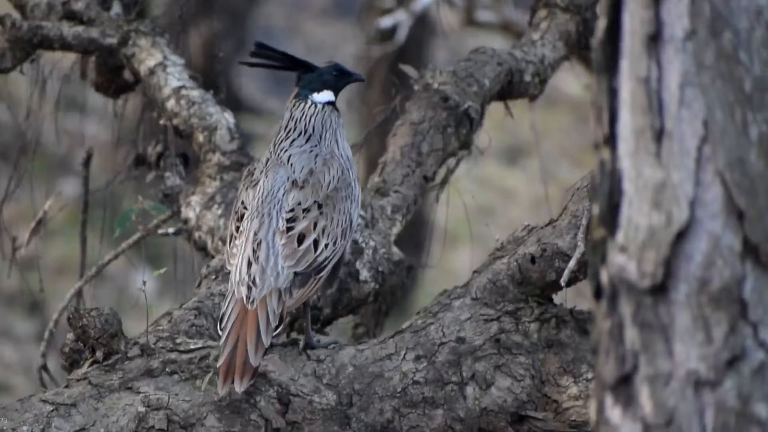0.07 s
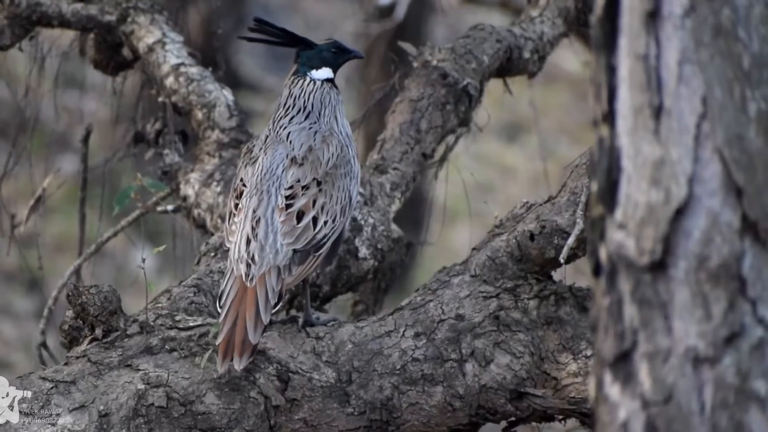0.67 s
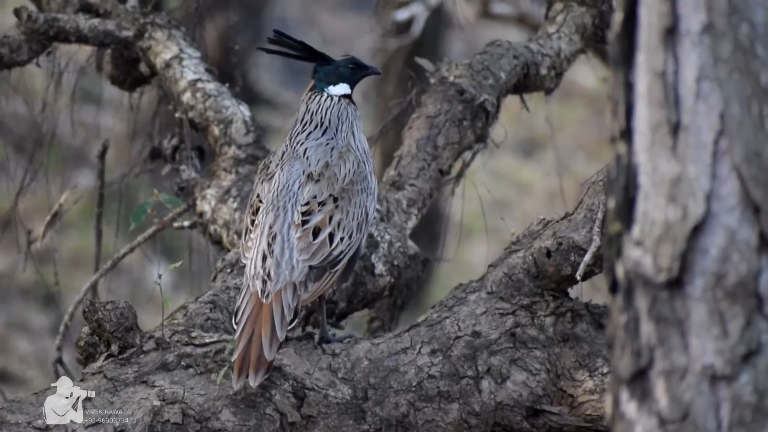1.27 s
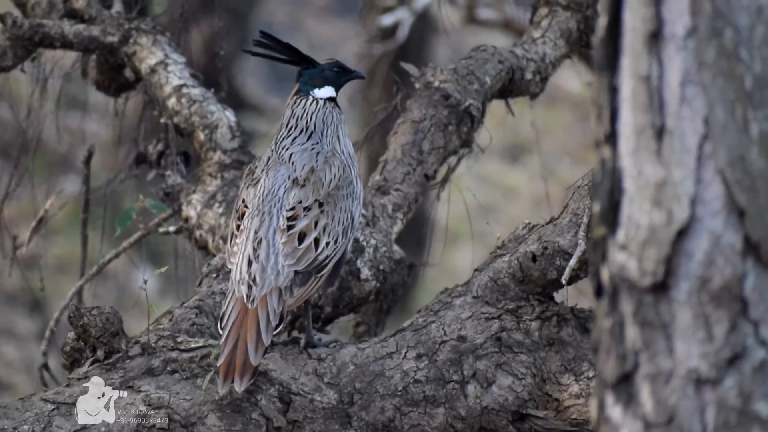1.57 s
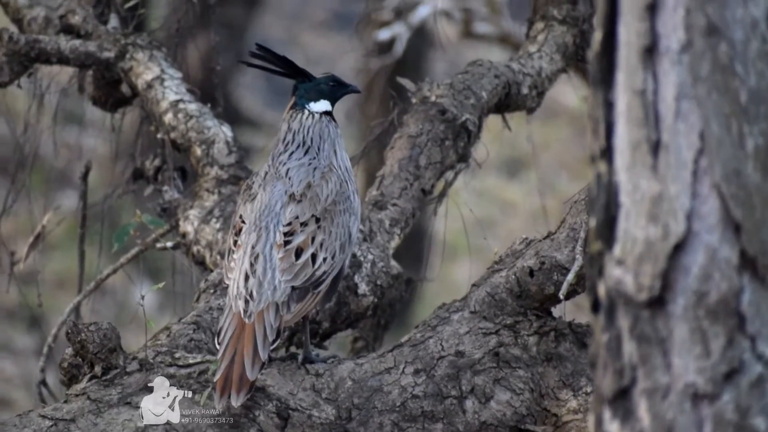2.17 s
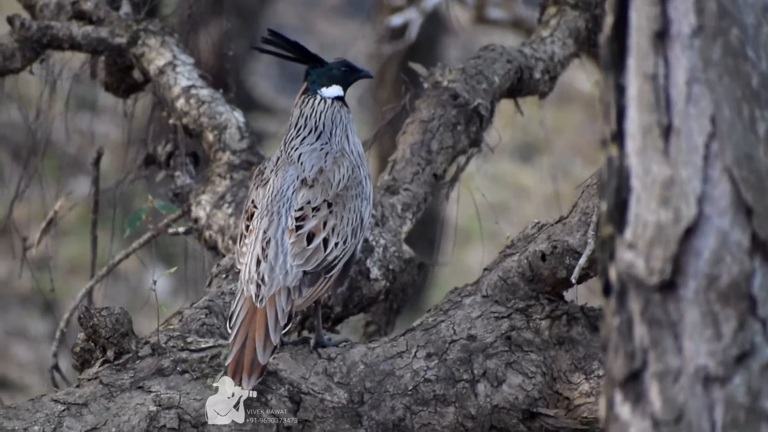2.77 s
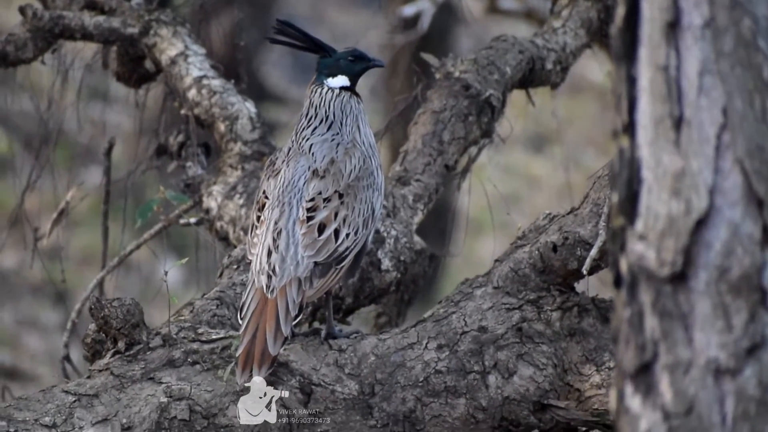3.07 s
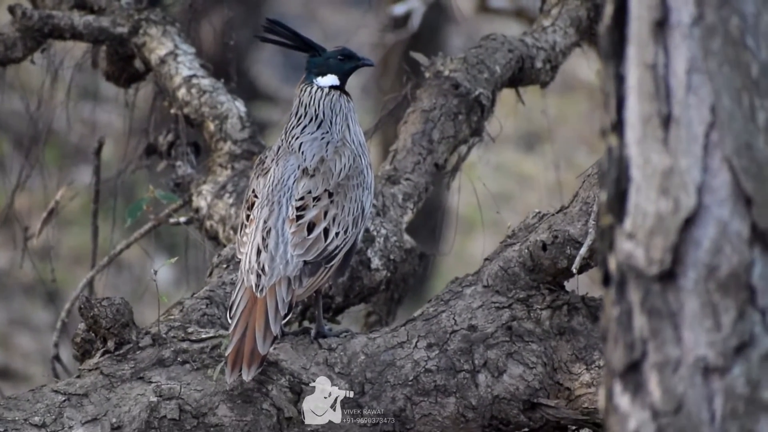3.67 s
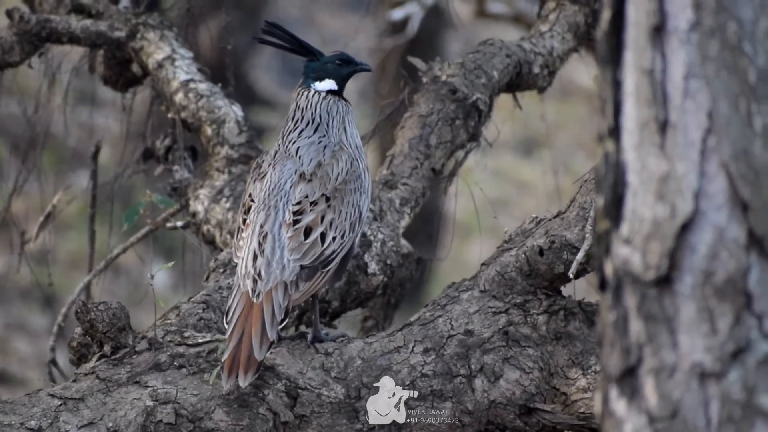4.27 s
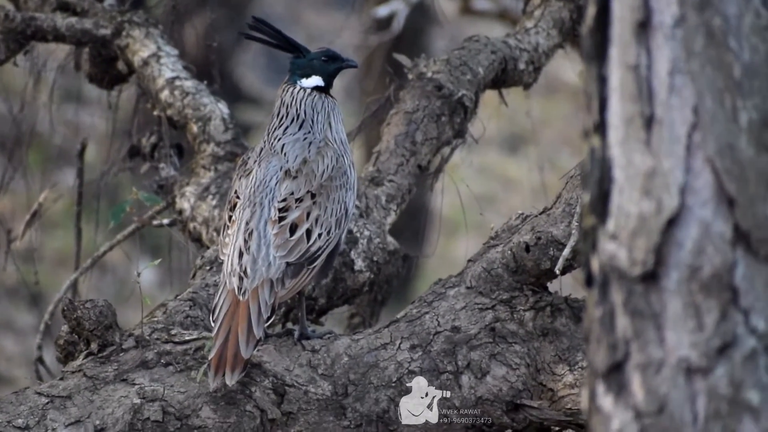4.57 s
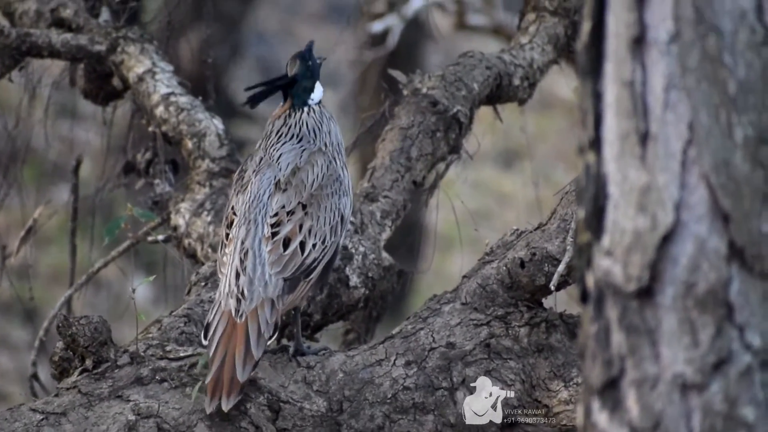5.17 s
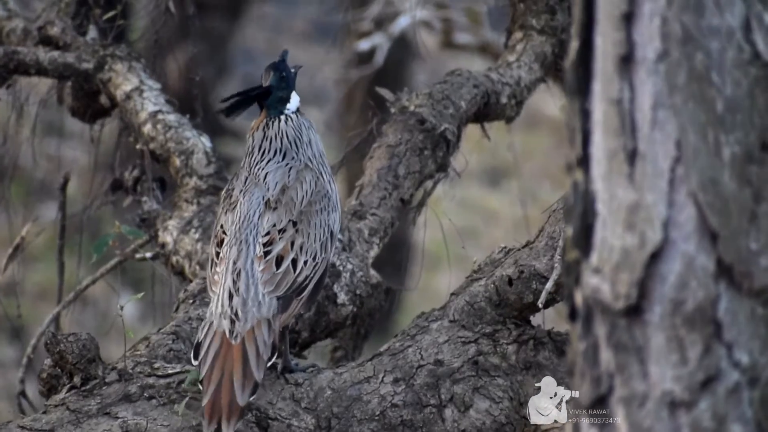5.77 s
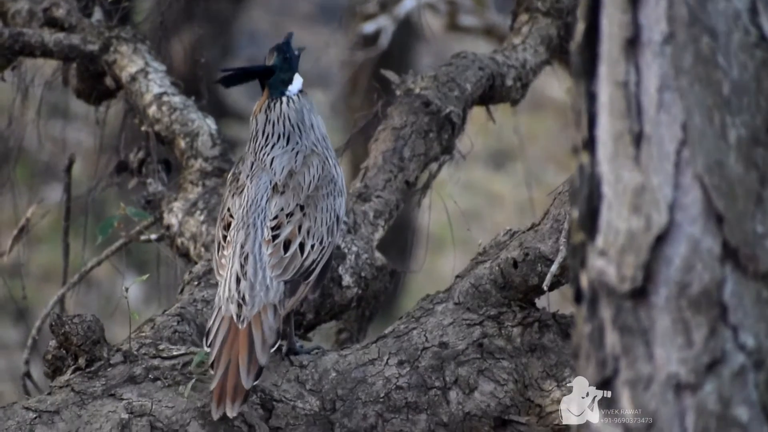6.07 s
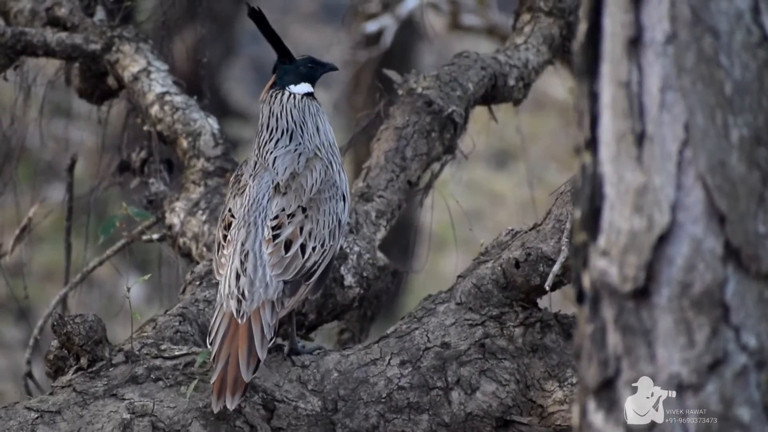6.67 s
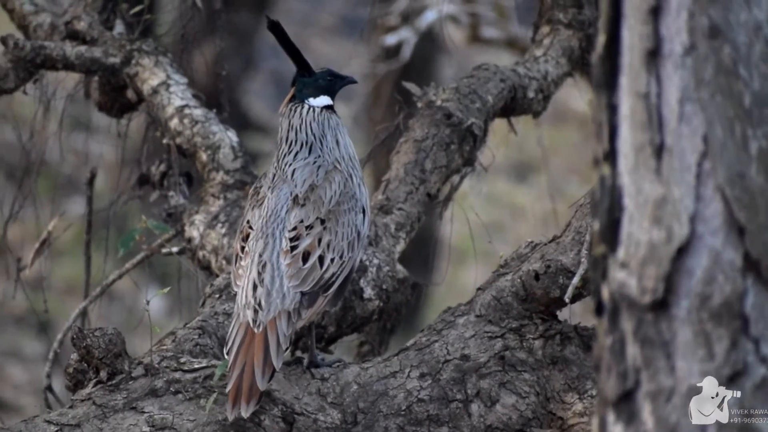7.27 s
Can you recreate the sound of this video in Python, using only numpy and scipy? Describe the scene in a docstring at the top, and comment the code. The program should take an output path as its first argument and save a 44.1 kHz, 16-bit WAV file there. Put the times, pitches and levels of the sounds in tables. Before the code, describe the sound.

Small birds whistle, chirp and twitter at a distance over a low, steady hush of woodland air. After several calm seconds a nearby pheasant breaks in with one loud, raspy call of five quick syllables, far louder than everything else. Its echo fades among the trees, leaving the thin chirps and whistles of the distant birds.

```python
"""A pheasant on a forest branch crows five harsh syllables: the membranes of its syrinx slap shut
unevenly, buzzing through throat and beak, and the trees answer with a long ring.
Further off one songbird see-saws two whistles, another chirps, others twitter and slur, all on
gliding sine tones. Underneath lie a soft rush of forest air, a few dull bumps and one tiny tick."""
import sys
import numpy as np
from scipy import signal
from scipy.fft import rfft, irfft, next_fast_len
from scipy.io import wavfile
from scipy.ndimage import uniform_filter1d, map_coordinates

SR = 44100
rng = np.random.default_rng(int(sys.argv[2]) if len(sys.argv) > 2 else 0)


def waveform_to_disk(signal):
    """Save audio, clipped to [-1, 1], as 16-bit WAV at the path in sys.argv[1]."""
    frames = np.transpose(np.atleast_2d(signal))
    scaled = np.clip(frames, -1, 1) * 32767
    samples = np.round(scaled).astype(np.int16)
    wavfile.write(sys.argv[1], SR, samples)


N = 331191


def amp(db):
    """Decibels to gain."""
    return 10 ** (np.asarray(db) / 20)


def unit(x):
    """Scale to rms 1."""
    return x / np.sqrt(np.mean(x ** 2) + 1e-20)


def along(points, hz):
    """Read a curve of (f/Hz, value) points on a log frequency axis."""
    f, v = np.transpose(points)
    return np.interp(np.log(hz + 1), np.log(f + 1), v)


def wobble(rate, size):
    """A smooth random modulator, rate knots a second."""
    knots = rng.standard_normal(int(size * rate / SR) + 4)
    return map_coordinates(knots, [np.arange(size) * rate / SR])


def filtered(x, response):
    """Zero-phase EQ; response gives the gain at each frequency."""
    size = x.shape[-1]
    padded = next_fast_len(size + 8192)
    return irfft(rfft(x, padded) * response(np.fft.rfftfreq(padded, 1 / SR)), padded)[..., :size]


def eq(x, points):
    """Shape x with a curve of (f/Hz, gain/dB) points."""
    return filtered(x, lambda hz: amp(along(points, hz)))


def resonate(x, points, size=2048):
    """Ring x through a causal (minimum-phase) body with this spectrum."""
    cepstrum = irfft(np.log(amp(along(points, np.fft.rfftfreq(size, 1 / SR)))))
    cepstrum[1:size // 2] *= 2
    cepstrum[size // 2 + 1:] = 0
    impulse = irfft(np.exp(rfft(cepstrum)))
    return signal.fftconvolve(x, impulse)[:len(x)]


def add(track, s, x):
    """Mix x into the track at time s."""
    part = track[..., max(round(s * SR), 0):][..., :x.shape[-1]]
    part += x[..., :part.shape[-1]]


def sine(hz):
    """A tone of rms 1 that follows a pitch curve."""
    return np.sqrt(2) * np.sin(2 * np.pi * np.cumsum(hz) / SR)


def steadied(x, size=700):
    """Hold the slow level of x at rms 1, keeping its fast grain."""
    return x / np.sqrt(np.abs(uniform_filter1d(x * x, size)) + 1e-12)


def stereo(mid, side):
    """Left and right from mid and side."""
    return np.array([mid + side, mid - side])


# tone of the air bed: f/Hz, relative level/dB
RUSH_EQ = [(15, -54), (25, -33), (133, -10), (260, -3), (340, -5.5), (399, 0), (537, -9), (741, -6),
           (1020, -9), (1490, -7.5), (2360, -12.5), (4040, -13.5), (6050, -22.5), (10400, -31.5),
           (15500, -38)]
# width of the air bed: f/Hz, side minus mid/dB
RUSH_WIDTH = [(60, -32), (150, -18.5), (380, -12.5), (950, -5.5), (2380, -5.5), (5980, -3), (15000, 1.5)]
# tone of the far rumble: f/Hz, relative level/dB
RUMBLE_EQ = [(80, -32), (120, -14.5), (200, -7.5), (270, 3.5), (330, -4.5), (400, -3.5), (520, -20),
             (900, -66)]
def air(rush_db=-57, rumble_db=-66, drone_hz=65, drone_db=-85):
    """A soft steady rush through the trees, with a low far rumble and a faint drone."""
    mid, side = unit(eq(rng.standard_normal((2, N)), RUSH_EQ))
    rush = amp(rush_db) * stereo(mid, eq(side, RUSH_WIDTH))
    mid, side = unit(eq(rng.standard_normal((2, N)), RUMBLE_EQ))
    rumble = amp(rumble_db + 1.8 * wobble(7.5, N)) * stereo(mid, amp(-28) * side)
    drone = amp(drone_db + 2 * wobble(6, N)) * sine(drone_hz * (1 + 0.029 * wobble(6.7, N)))
    return rush + rumble + drone


# soft low bumps: t/s, length/s, f/Hz, level/dB
DULL_BUMPS = [(5.74, 0.058, 253, -50.5), (5.777, 0.085, 263, -48.5), (7.023, 0.064, 247, -51)]
def bumps_and_tick(waver=0.089, tick_s=4.229, tick_db=-53, tick_t60=0.0081):
    """Short swells of a wavering low tone, and one dry snap of bright noise."""
    out = np.zeros(N)
    for s, length, hz, db in DULL_BUMPS:
        size = int(length * SR)
        add(out, s, amp(db) * np.hanning(size) * sine(hz * (1 + waver * wobble(114, size))))
    t = np.arange(SR // 20) / SR
    burst = rng.standard_normal(len(t)) * amp(-60 * t / tick_t60)
    snap = resonate(burst, [(2000, -12), (7000, 8), (11500, 8), (15000, -14)])
    add(out, tick_s, amp(tick_db) * snap)
    return out


# ring time of the wood: f/Hz, T60/s
TAIL_DECAY = [(200, 0.59), (800, 1.5), (1500, 1.4), (2500, 1.2), (4200, 0.86), (7000, 0.58), (13000, 0.25)]
# colour of that ring: f/Hz, relative level/dB
TAIL_EQ = [(300, -25), (800, -2), (1150, -18), (1450, -4), (1670, -5), (2000, -11.5), (2500, -8),
           (4200, -5.5), (8000, 3), (14000, -4.5)]
# width of the reverb: f/Hz, side minus mid/dB
REVERB_WIDTH = [(500, -29), (1500, -20), (2500, -11), (5000, -11.5), (12000, -8.5)]
def forest(x, wet_db, near_db, build_s=0.01, near_t60=0.39):
    """Near trunks scatter the sound at once; the wood beyond rings on, longest in the mids."""
    hz, t, noise = signal.stft(rng.standard_normal((2, int(1.3 * SR))), SR, nperseg=256)
    decay = amp(along(TAIL_EQ, hz)[:, None] - 60 * t / along(TAIL_DECAY, hz)[:, None])
    build = 1 - np.exp(-t / build_s)
    tail = signal.istft(noise * decay * build, SR, nperseg=256)[1]
    near = rng.standard_normal(tail.shape) * amp(-60 * np.arange(tail.shape[1]) / SR / near_t60)
    mid, side = (amp(wet_db) * tail / np.linalg.norm(tail[0])
                 + amp(near_db) * near / np.linalg.norm(near[0]))
    mid[0] += 1  # the direct path
    impulse = stereo(mid, eq(side, REVERB_WIDTH))
    return signal.fftconvolve(x[None], impulse, axes=1)[:, :N]


def chorus(count=38, level_db=-67, low_hz=2200, high_hz=4700, glide=0.0965, length=0.072, waver=0.0287):
    """Faint scattered slurs from the farthest birds."""
    out = np.zeros(N)
    u = np.linspace(-1, 1, int(length * SR))
    for when, pitch, slope in rng.uniform(0, 1, (count, 3)):
        centre_hz = low_hz * (high_hz / low_hz) ** pitch
        bend = np.exp(glide * (2 * slope - 1) * u + waver * wobble(147, len(u)))
        add(out, when * N / SR, amp(level_db) * (1 - u * u) * sine(centre_hz * bend))
    return out


def slur(length, start_hz, end_hz, ease, waver):
    """A short wavering glide; with ease above 1 it moves fast at first and then levels off."""
    u = np.linspace(0, 1, int(length * SR))
    hz = end_hz + (start_hz - end_hz) * (1 - u) ** ease
    swell = np.sqrt(np.abs(np.sin(np.pi * u)))
    return swell * sine(hz * (1 + waver * wobble(160.3, len(u))))


# the distant song: t/s, length/s, start f/Hz, end f/Hz, level/dB
FAR_SONG = [(0.097, .052, 2360, 3020, -59.5), (0.867, .079, 2600, 3030, -62),
            (0.949, 0.065, 3750, 3560, -54), (1.713, 0.14, 2640, 3000, -60),
            (2.646, 0.033, 3340, 3570, -57), (2.775, .045, 5300, 3700, -55),
            (2.776, 0.087, 1975, 2093, -59), (3.046, 0.16, 2920, 2327, -60), (3.42, 0.037, 5750, 6050, -66),
            (3.515, .08, 3310, 2470, -60.5), (3.665, .098, 2234, 2450, -59.5),
            (4.444, .046, 3700, 3710, -61.5), (6.876, 0.094, 2776, 3005, -59),
            (6.969, 0.13, 3660, 2994, -60.5), (7.387, .14, 3050, 2520, -55.5)]
def far_singer():
    """Mellow slurs from a bird deep in the trees."""
    out = np.zeros(N)
    for s, length, start_hz, end_hz, db in FAR_SONG:
        add(out, s, amp(db) * slur(length, start_hz, end_hz, ease=1.5, waver=0.0277))
    return out


# thin high slurs: t/s, start f/Hz, end f/Hz
THIN_SLURS = [(1.969, 5600, 7500), (2.055, 7200, 5640), (2.29, 5530, 6660), (2.46, 7200, 5560),
              (2.545, 5300, 7400), (2.615, 7100, 5840), (3.259, 8100, 6250), (3.59, 8200, 6400)]
# quick upward flicks: t/s, level/dB
UP_FLICKS = [(1.869, -60), (2.943, -56), (2.969, -51), (2.994, -63), (3.024, -55.5), (6.317, -53),
             (6.348, -49), (6.378, -53)]
def twitter(slur_s=.055, slur_db=-68.5):
    """A tiny bird runs thin slurs up and down, with a few sharper upward flicks."""
    out = np.zeros(N)
    for s, start_hz, end_hz in THIN_SLURS:
        add(out, s, amp(slur_db) * slur(slur_s, start_hz, end_hz, ease=1.4, waver=0.013))
    for s, db in UP_FLICKS:
        add(out, s, amp(db) * slur(length=0.022, start_hz=5480, end_hz=7280, ease=0.68, waver=0.011))
    return out


# trilled chirps: t/s, level/dB
CHIRP_CUES = [(.915, -56.5), (1.889, -38.5), (2.873, -38), (3.751, -42), (4.272, -55.5), (6.509, -54.5)]
def chirper(low_hz=3200, top_hz=5230, arch_s=.028, climb_s=.007, trill_start=.039, length=.092,
            trill_hz=100, trill_depth=0.071, low_db=-19, arch_db=-2, overtone_db=-37):
    """A quick arch, then a falling note with a fast trill on it; louder the higher it is."""
    out = np.zeros((2, N))
    t = np.arange(int(length * SR)) / SR
    arch = np.sin(np.pi * np.minimum(t / arch_s, 1))
    fall = np.interp(t, [trill_start - climb_s, trill_start, length], [0, 1, 0]) ** .75
    height = arch + fall
    trill_gate = np.interp(t - trill_start, [-.004, 0.0006, 0.018, 0.0305], [0, 1, 1, 0])
    trill = trill_depth * np.cos(2 * np.pi * trill_hz * (t - trill_start)) * trill_gate
    swell = amp(low_db * np.abs(1 - height) ** 1.56 + arch_db * (t < arch_s))
    nearest_db = max(db for s, db in CHIRP_CUES)
    for s, db in CHIRP_CUES:
        hz = (low_hz + (top_hz - low_hz) * height) * (1 + trill + 0.013 * wobble(196, len(t)))
        note = amp(db) * swell * (sine(hz) + amp(overtone_db) * sine(2 * hz))
        send_db = 0.27 * (nearest_db - db)  # fainter chirps are further off and wetter
        add(out, s, forest(note, wet_db=-12 + send_db, near_db=-8 + send_db))
    return out


def whistle(length, start_hz, end_hz, glide_s, steepness, peak_s, sharpness, release_s=.012, waver=.003):
    """A pure note that eases from one pitch to another, swelling early and dying away."""
    t = np.arange(int(length * SR)) / SR
    hz = end_hz + (start_hz - end_hz) * np.exp(-(t / glide_s) ** steepness)
    swell = (t / peak_s * np.exp(1 - t / peak_s)) ** sharpness
    release = np.clip((length - t) / release_s, 0, 1)
    return swell * release * sine(hz * (1 + waver * wobble(98, len(t))))


# see-saw whistle pairs: rising note t/s, falling note t/s, rising note level/dB
WHISTLE_PAIRS = [(0.164, 0.391, -61), (0.765, 1.007, -53), (1.379, 1.626, -52.5), (2.009, 2.261, -51),
                 (2.652, 2.894, -53), (7.154, 7.393, -57.5)]
def whistler(fall_db=-48):
    """A songbird alternates a rising and a falling pure whistle."""
    out = np.zeros(N)
    for rise_s, fall_s, rise_db in WHISTLE_PAIRS:
        rise = whistle(length=0.15, start_hz=4160, end_hz=4640, glide_s=.1, steepness=4.68,
                       peak_s=0.039, sharpness=1.4)
        fall = whistle(length=0.187, start_hz=4260, end_hz=3275, glide_s=.064, steepness=1.75,
                       peak_s=.066, sharpness=2.26)
        add(out, rise_s, amp(rise_db) * rise)
        add(out, fall_s, amp(fall_db) * fall)
    return out


def branches(x, count=7, reach_s=.009, echo_db=-16):
    """Weak reflections off the branches around the perch, new with each turn of the head."""
    delays = (rng.uniform(.1, 1, count) * reach_s * SR).astype(int)
    signs = rng.choice([-1, 1], count)
    copies = sum(sign * np.pad(x, (delay, 0))[:len(x)] for delay, sign in zip(delays, signs))
    return (x + amp(echo_db) * copies) / np.sqrt(1 + count * amp(2 * echo_db))


def syrinx(hz, jitter=.1, breath=.34, waver=0.04015, shimmer_db=3, rattle_db=1.5):
    """Membranes slap shut unevenly, once a cycle, with a puff of turbulence. Returns buzz and swing."""
    size = len(hz)
    cycles = np.cumsum(hz * (1 + waver * wobble(400, size))) / SR
    closures = np.arange(1, int(cycles[-1]))
    chance = rng.standard_normal((len(closures), 2))
    slap_at = np.interp(closures + jitter * chance[:, 0], cycles, np.arange(size))
    taps = slap_at.astype(int)[:, None] + np.arange(-7, 9)
    offset = taps - slap_at[:, None]
    slaps = amp(shimmer_db * chance[:, 1:]) * np.sinc(offset) * np.sinc(offset / 8)  # band-limited
    pulses = np.bincount(np.clip(taps, 0, size - 1).ravel(), slaps.ravel(), size)
    puffs = rng.standard_normal(size) * (1 + np.cos(2 * np.pi * cycles))
    rattle = amp(rattle_db * wobble(238.8, size))
    buzz = np.sqrt(1 - breath) * unit(pulses - pulses.mean()) + np.sqrt(breath) * unit(puffs)
    slip_rad = 0.57 * wobble(220.6, size)
    swing = np.sin(2 * np.pi * 2 * cycles + slip_rad)  # the membranes' smooth second harmonic
    flutter = amp(1.2 * wobble(167.6, size))
    return buzz * rattle, unit(swing * rattle * flutter)


# throat formants at the home pitch: f/Hz, relative level/dB
THROAT_FORMANTS = [(100, -64), (300, -55.5), (470, -31), (660, -16.5), (820, -16), (1000, -12),
                   (1280, -4.5), (1600, 4.5), (1950, -3), (2300, -6), (2650, -13), (3100, -24.5),
                   (3800, -70.5)]
def throat(buzz, hz, home_hz=790):
    """Resonances that slide with the pitch: they ring on a clock that runs faster as it rises."""
    clock = np.cumsum(hz / home_hz)
    ticks = np.arange(int(clock[-1]))
    ringing = resonate(np.interp(ticks, clock, buzz), THROAT_FORMANTS)
    return unit(np.interp(clock, ticks, ringing))


# the bright rasp around the beak's two resonances: f/Hz, relative level/dB
RASP_EQ = [(500, -85), (1900, -46.5), (2500, -3), (3100, -7), (3680, -3.5), (4550, -10.5), (5300, -20),
           (6250, -16.5), (6650, -19), (7400, -17), (8000, -23), (10000, -25), (13500, -42), (15500, -52.5)]
def beak(buzz, lower_db, upper_hz, lower_hz=3420, upper_db=2, treble_hz=5500):
    """The beak opens and closes over a syllable; when narrow it mutes the rasp, the top most of all."""
    gape = np.abs(np.sin(np.linspace(0, np.pi, len(buzz)))) + 1e-6
    formants = sorted(RASP_EQ + [(lower_hz, lower_db), (upper_hz, upper_db)])
    rasp = steadied(resonate(buzz, formants))
    treble = filtered(rasp, lambda hz: 1 - 1 / (1 + (hz / treble_hz) ** 10))
    return gape ** 0.4 * (rasp - treble * (1 - gape ** 0.77))


# the crow: t/s, length/s, attack/s, level/dB, level ramp/dB, f/Hz, pitch bend/Hz, effort/0-1
CROW_SYLLABLES = [(4.848, 0.13, 0.021, -18, 5.5, 713, 15, 0),
                  (5.108, 0.19, 0.016, -15.5, 1, 795.2, 30, .85),
                  (5.583, 0.15, 0.012, -16.5, 3, 795, 19.5, 0.78), (5.8, .25, 0.013, -15, -6, 799, -50, 1),
                  (6.151, 0.25, 0.012, -17, -11, 750, -155, 0.53)]
def pheasant(body_db=-1, second_ratio=2.4, second_waver=0.0382, scoop=.14, scoop_s=.013,
             settle_s=0.031, release_s=0.029, rasp_fade=0.37):
    """Each syllable scoops up into a rough buzz with a strong second harmonic; effort adds harshness."""
    out = np.zeros((2, N))
    for s, length, attack, db, ramp_db, pitch_hz, bend_hz, effort in CROW_SYLLABLES:
        pushed = lambda relaxed, forced: relaxed + effort * (forced - relaxed)
        t = np.arange(int(length * SR)) / SR
        late = (t / length) ** 2.4  # pitch and level hold at first and bend late
        hz = (pitch_hz + bend_hz * late) * (1 - scoop * np.exp(-t / scoop_s))
        buzz, swing = syrinx(hz)
        locked_in = np.clip(t / settle_s, 0, 1)
        clear_tone = amp(pushed(-1, -8)) * locked_in * swing
        # the other side of the syrinx adds a higher, inharmonic tone
        second_hz = second_ratio * hz * (1 + second_waver * wobble(349, len(t)))
        second_voice = amp(pushed(-10, -4)) * sine(second_hz)
        body = steadied(throat(buzz, hz) + clear_tone + second_voice)
        rasp = beak(buzz, lower_db=pushed(-3.5, 0.5), upper_hz=pushed(3930, 4150))
        rasp = branches(rasp)  # thin branches reflect only the short waves
        rasp_db = pushed(-12.5, -6.5) + rasp_fade * ramp_db * late  # duller as it fades
        onset = (1 - np.exp(-t / attack)) ** 1.44  # the voice catches gently before it swells
        release = np.clip((length - t) / release_s, 0, 1)
        envelope = amp(db + ramp_db * late) * onset * release
        voice = envelope * (amp(body_db) * body + amp(rasp_db) * rasp)
        add(out, s, forest(voice, wet_db=-11.5, near_db=-6))
    return out


def scene():
    """The pheasant is close; the further a bird, the more forest is in its sound."""
    whistles = forest(whistler(), wet_db=-10, near_db=-7)
    chirps = chirper()
    twitters = forest(twitter(), wet_db=-7.5, near_db=-4)
    far_birds = forest(far_singer() + chorus(), wet_db=-3.5, near_db=1)
    return pheasant() + whistles + chirps + twitters + far_birds + bumps_and_tick() + air()


# stereo balance of the mix: f/Hz, left minus right/dB
BALANCE = [(100, -1), (600, 0.1), (1400, -1), (4000, -1.05), (8000, -0.4), (14000, 0)]
def record(dry, start_s=.072, top_hz=15700):
    """The mix opens after a moment of silence, leaning slightly right, with the very top cut off."""
    gate = np.arange(N) / SR > start_s
    balance = lambda hz: amp(np.outer([.5, -.5], along(BALANCE, hz)))
    return filtered(dry * gate, lambda hz: balance(hz) * (hz < top_hz))


dry = scene()
out = record(dry)
waveform_to_disk(out)
```